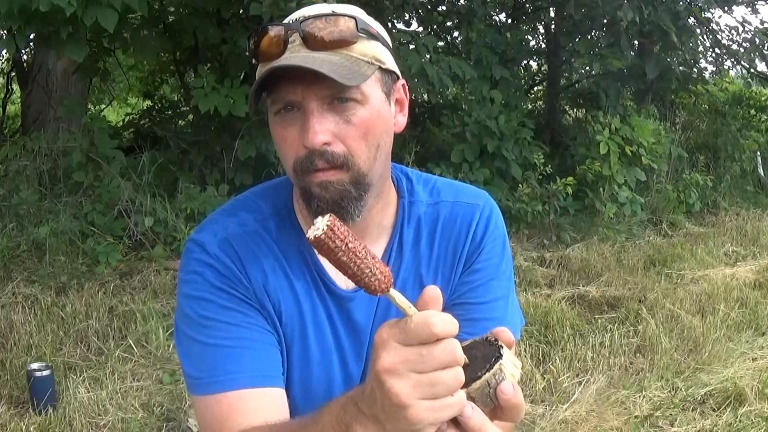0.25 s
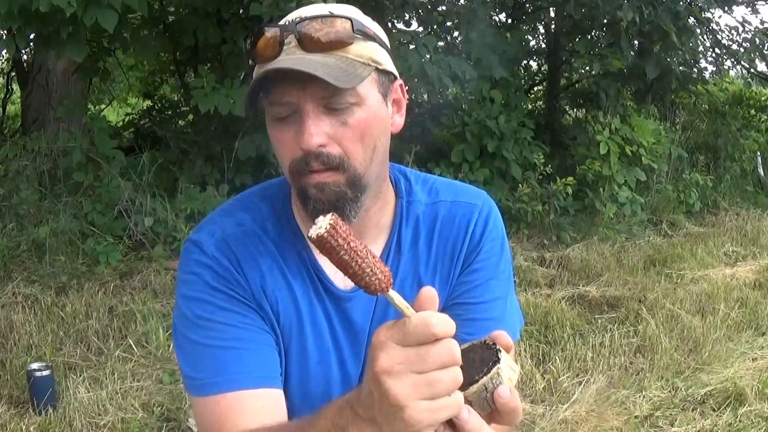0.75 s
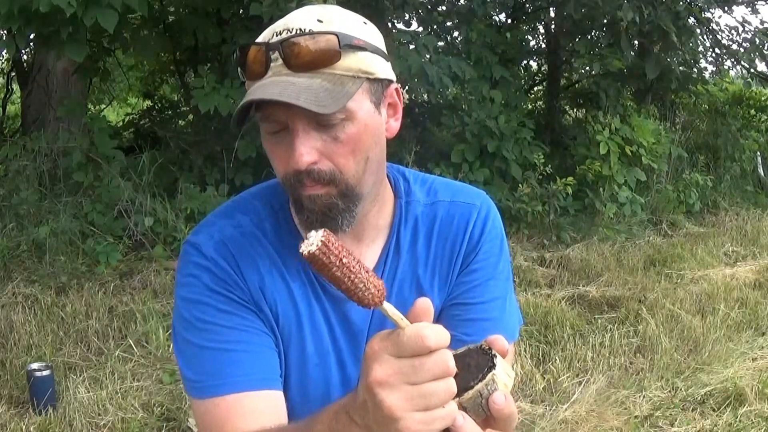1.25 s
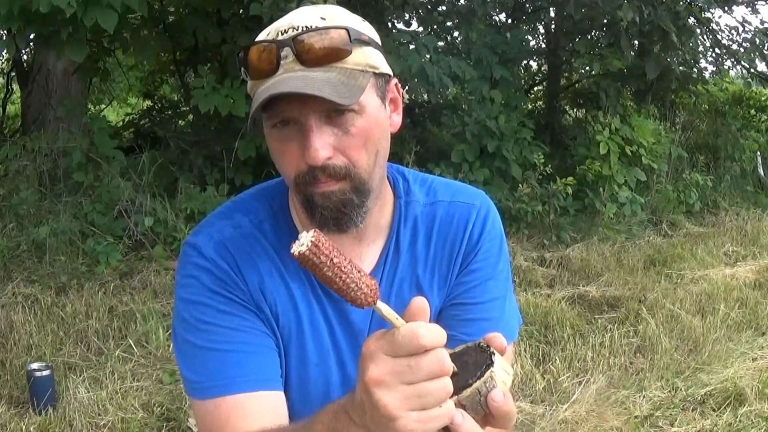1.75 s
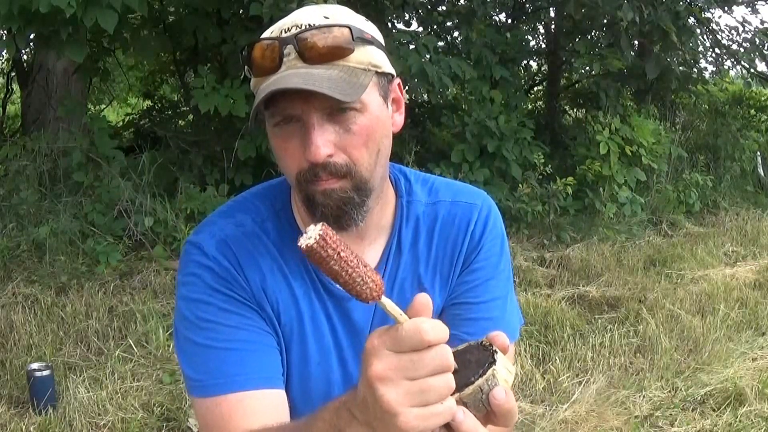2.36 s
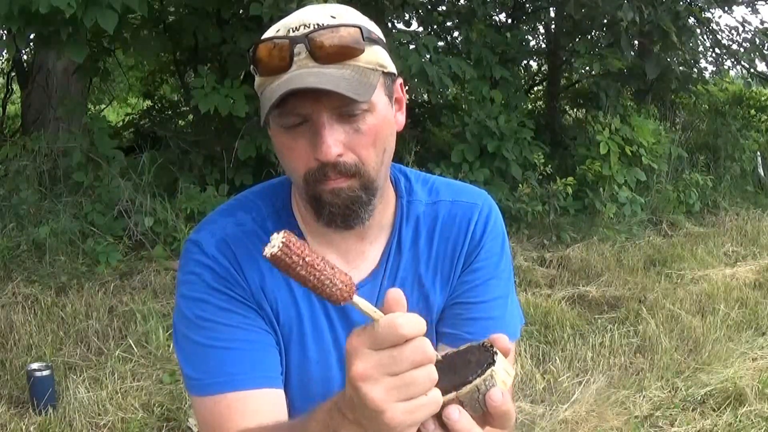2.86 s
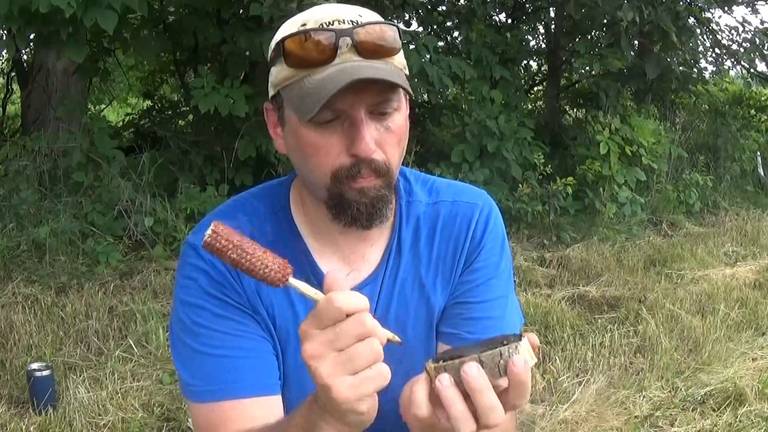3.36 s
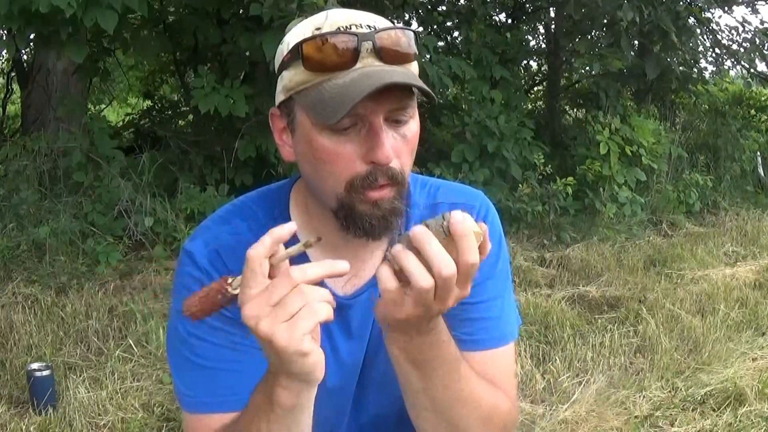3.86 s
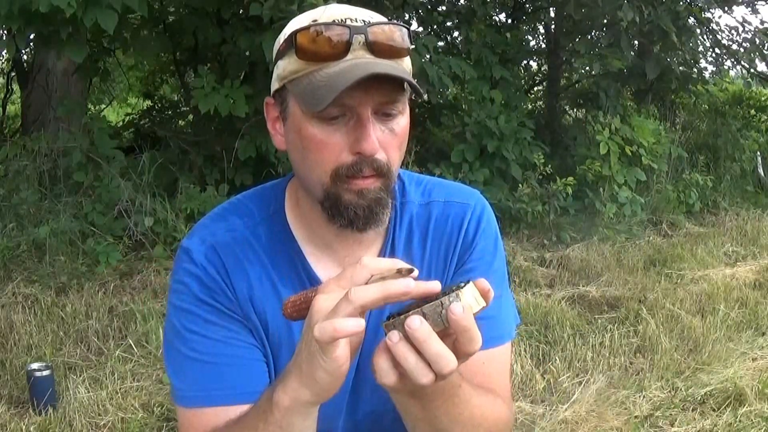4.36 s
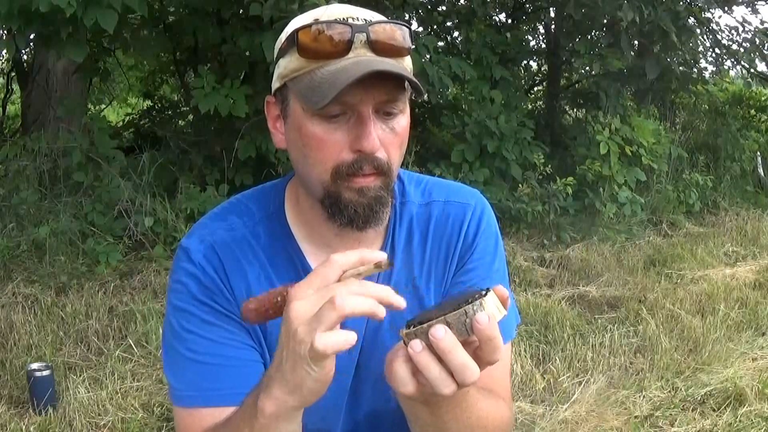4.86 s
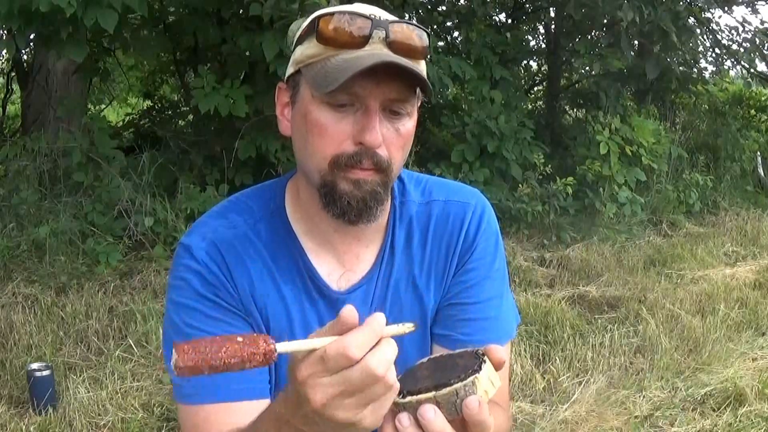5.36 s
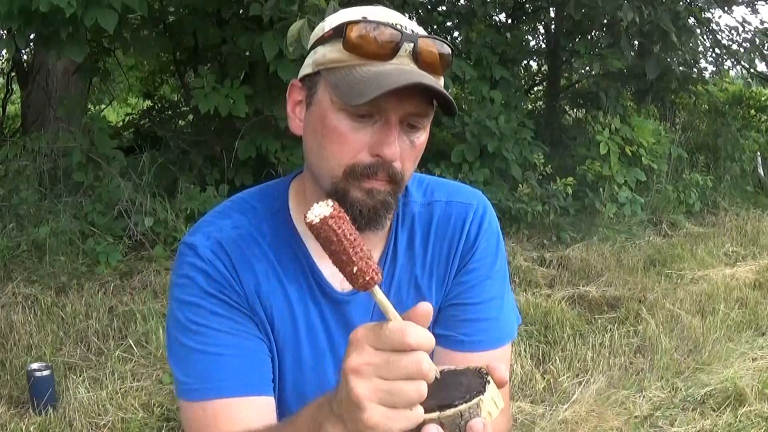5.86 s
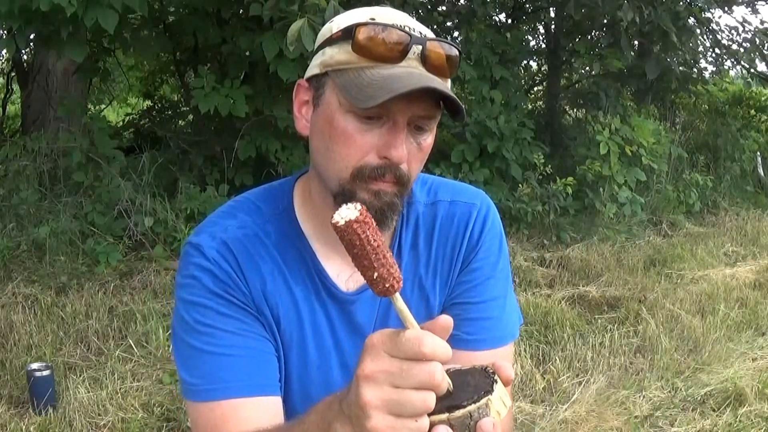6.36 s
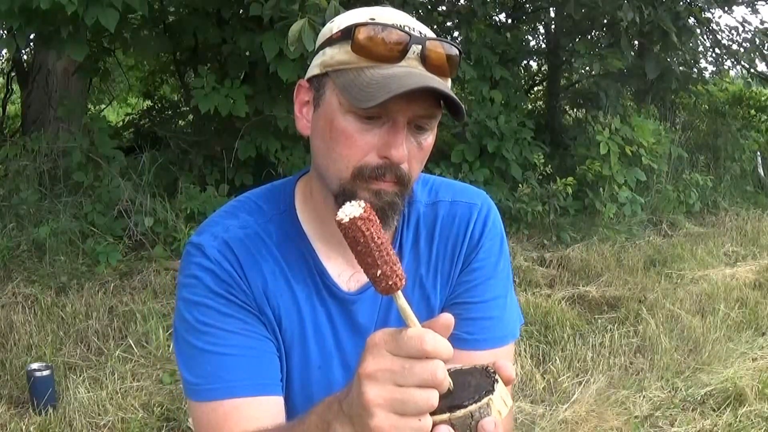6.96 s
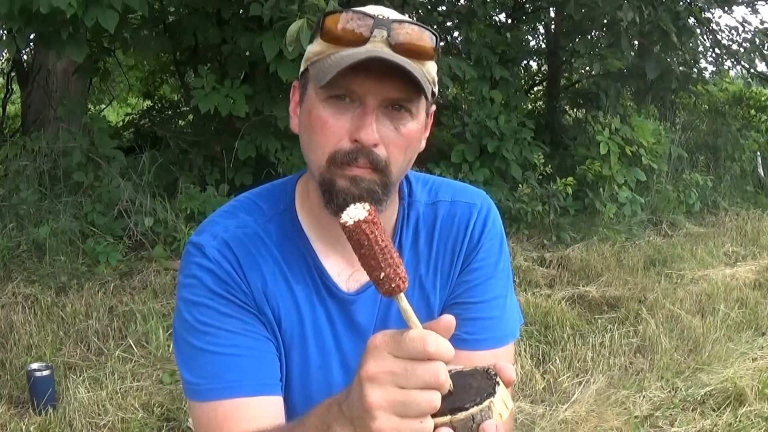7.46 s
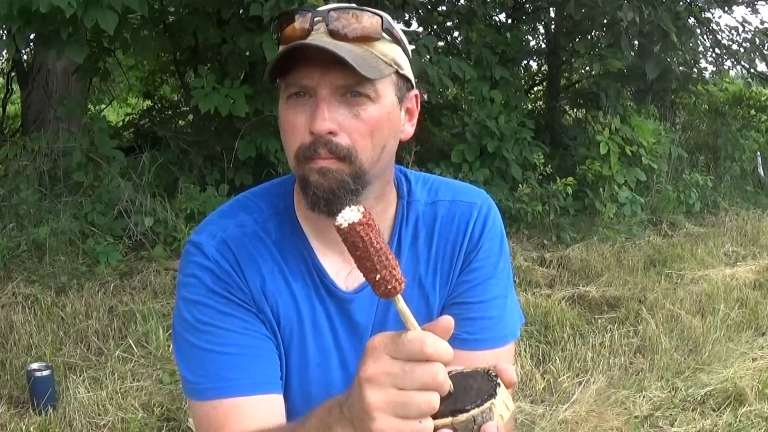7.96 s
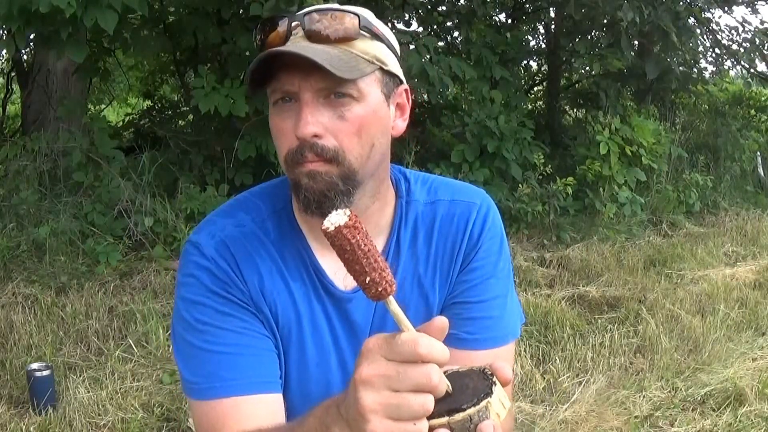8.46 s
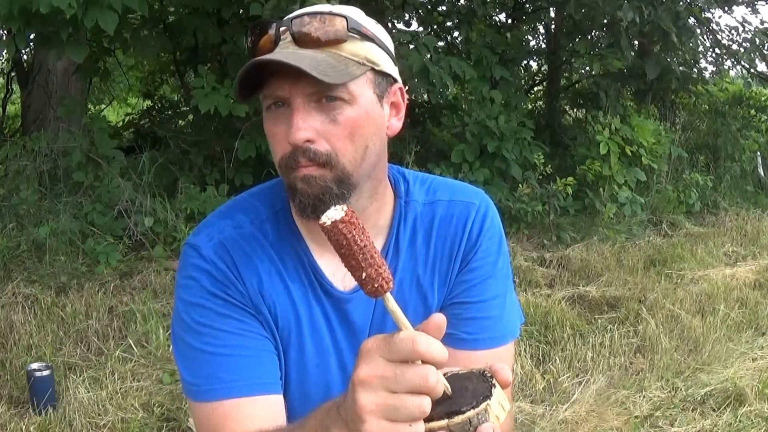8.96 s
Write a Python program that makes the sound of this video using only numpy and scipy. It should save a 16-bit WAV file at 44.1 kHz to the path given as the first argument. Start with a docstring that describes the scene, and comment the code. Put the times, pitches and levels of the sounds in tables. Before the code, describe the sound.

A wooden striker rubs on a slate turkey call, making ten raspy, squeaky yelps in an even run, with a few sharp taps of the tip. In the pause, fingers knock softly on the call and a songbird repeats a quick, buzzy phrase. Four softer, short clucks follow. The call is close and centred, at the edge of a wood with birds, faint insect hiss and a light breeze.

```python
"""At the edge of a wood, a friction turkey call plays ten yelps: a wooden striker sticks and slips
on slate several hundred times a second, and the pot under the slate resonates. In the pause the fingers
shift their grip and the nearest songbird repeats a short phrase. Four clucks follow from about 7 s.
Throughout, birds sing in the trees, insects hiss in the grass, air stirs and a faint ticking runs on."""
import sys
import numpy as np
from scipy import signal
from scipy.fft import rfft, irfft, next_fast_len
from scipy.io import wavfile

SR = 44100
rng = np.random.default_rng(int(sys.argv[2]) if len(sys.argv) > 2 else 0)


def wav_record(signal):
    """Record a signal, one row per channel, as 16-bit PCM in the file named by sys.argv[1]."""
    frames = np.transpose(np.atleast_2d(signal))
    bounded = np.clip(frames, -1, 1)
    # unit amplitude maps onto the largest positive 16-bit level
    quanta = np.round(bounded * 32767).astype(np.int16)
    wavfile.write(sys.argv[1], SR, quanta)


N = 406161
CUTOFF_HZ = 11050
FFT_SIZE = next_fast_len(N + SR)
BIN_HZ = np.maximum(np.arange(FFT_SIZE // 2 + 1) * SR / FFT_SIZE, 1)

# squeak_hz, fade_db, shaft_db
YELP_GRIP, CLUCK_GRIP = (10510, 25.6, -26.5), (10040, 12.4, -18.5)
# start_s, peak_pressure_s, end_s, attack_s, low_hz, last_hz, level_db, squeak_db
STRIKER_STROKES = [(0.204, 0.243, 0.2895, 0.027, 326.2, 651, -33, -7),
                   (0.48, 0.496, 0.578, 0.03, 355.4, 711, -29.5, -10),
                   (0.763, 0.791, 0.859, 0.024, 319.6, 683, -29.5, -8.5),
                   (1.044, 1.069, 1.134, 0.027, 314.2, 768, -27, -9.5),
                   (1.314, 1.338, 1.408, 0.026, 340.7, 530, -32, -11.5),
                   (1.609, 1.63, 1.681, 0.029, 352, 643, -26.5, -10.5),
                   (1.89, 1.921, 1.971, 0.031, 340.4, 794, -27.5, -10),
                   (2.157, 2.185, 2.242, 0.034, 338.6, 763, -25.5, -13),
                   (2.482, 2.494, 2.536, 0.0091, 419, 817, -26, -18),
                   (2.77, 2.789, 2.828, 0.0054, 393, 598, -28.5, -16.5),
                   (6.952, 6.972, 7.001, 0.015, 577.5, 890, -37, -10),
                   (7.46, 7.48, 7.509, 0.01, 406, 943, -36, -8),
                   (7.888, 7.909, 7.978, 0.014, 392.5, 964, -32.5, -7.5),
                   (8.333, 8.361, 8.405, 0.011, 333.2, 668, -32.5, -6.5)]

def turkey_call(regrip_s=5, sink_hz=249.9, release_s=.0059, tip_attack_s=.0027, swell_db=2, ease_db=4):
    """Pressure slows and sharpens the slips; as the hand eases, pitch climbs and the squeak fades."""
    out = np.zeros(N)
    for start, turn, end, attack_s, low_hz, last_hz, db, squeak_db in STRIKER_STROKES:
        squeak_hz, fade_db, shaft_db = YELP_GRIP if start < regrip_s else CLUCK_GRIP
        t = np.arange(start, end, 1 / SR)
        pressing = np.clip((turn - t) / (turn - start), 0, 1)
        easing = np.clip((t - turn) / (end - turn), 0, 1)
        pitch_hz = low_hz + sink_hz * pressing ** 2.1 + (last_hz - low_hz) * easing ** 1.8
        contact = np.clip((t - start) / attack_s, 0, 1) * np.clip((end - t) / release_s, 0, 1)
        force = contact * from_db(swell_db * easing - ease_db * easing ** 3) * slips(t, pitch_hz)
        rounded = signal.sosfilt(signal.butter(1, 2800, fs=SR, output="sos"), force)
        sharpness = from_db(-.6 * fade_db * easing ** 2)
        pot = signal.fftconvolve(sharpness * force + (1 - sharpness) * rounded, pot_ring())
        pot /= np.sqrt(np.sum(pot ** 2) / len(t))
        squeak_gain = np.clip((t - start) / tip_attack_s, .3, 1) * from_db(-fade_db * easing ** 2.36)
        squeak = rms_one(double_resonance(force * squeak_gain, squeak_hz, width_hz=1700))
        shaft = rms_one(double_resonance(sharpness * force, hz=3230, width_hz=1960))
        add(out, start, from_db(db + 1.5) * pot)
        add(out, start, from_db(db + squeak_db + 2) * squeak + from_db(db + shaft_db) * shaft)
    return out


def slips(t, pitch_hz, harmonics=38):
    """Stick-slip friction: one sharp, slightly gritty pulse per slip, nearly even in time and strength."""
    phase = 2 * np.pi * np.cumsum(pitch_hz * (1 + .01 * drift(t, 400))) / SR
    k = np.arange(1, harmonics + 1)[:, None]
    pulses = rms_one(np.sum(np.cos(k * phase) * (k * pitch_hz < CUTOFF_HZ + 1000), axis=0))
    grit = rms_one(np.exp(2 * (np.cos(phase - 1) - 1)) * rng.standard_normal(len(t)))
    return (pulses + .24 * grit) * from_db(1.2 * drift(t, 450))


# Broad response of slate and pot: freq_hz, gain_db
POT_RESPONSE = [(100, -60), (300, -49), (500, -25.5), (720, -14), (1150, -7.5), (1750, -5), (2000, -11),
                (2250, -14.5), (2800, -28.5), (3500, -22.5), (5400, -20), (6500, -22), (7800, -21.5),
                (9000, -29.5)]
# Resonances and notches: centre_hz, width_hz, gain_db
POT_RESONANCES = [(794, 81, 3), (913, 134, -6.5), (1147, 39, 3.5), (1894, 162, 12), (2197, 40, -16),
                  (2180, 67, 10), (2260, 96, -4), (2476, 230, 9.5)]
# Ring smeared by the slate's close modes: freq_hz, power_share
SLATE_SMEAR = [(2200, 0.08), (3000, 0.73), (5500, 0.14), (7500, 0.12), (9500, 0.64)]

def pot_ring(size=2048, slate_t60_s=.021, lag_hz=1650, lag_width_hz=700):
    """Response of slate and pot to one slip, a little different at each spot on the slate."""
    hz = np.maximum(np.arange(size // 2 + 1) * SR / size, 1)
    modes_db = sum(db / (1 + (2 * (hz - centre) / width) ** 2) for centre, width, db in POT_RESONANCES)
    # folding the cepstrum makes the pulse causal
    cepstrum = irfft(np.log(from_db(at_hz(POT_RESPONSE, hz) + modes_db)))
    cepstrum[1:size // 2] *= 2
    cepstrum[size // 2 + 1:] = 0
    slate = noise_burst(size, slate_t60_s)
    share = at_hz(SLATE_SMEAR, hz)
    smear = np.sqrt(1 - share) + np.sqrt(share) * rfft(slate) / np.sqrt(np.sum(slate ** 2))
    # allpass: bending waves near the main resonance arrive late
    pole = lag_hz ** 2 - hz ** 2 + 1j * hz * lag_width_hz
    return irfft(np.exp(rfft(cepstrum)) * smear * np.conj(pole) / pole)[:size // 2]


# start_s, peak_db, treble_db
STRIKER_TAPS = [(0.713, -37.5, -25), (1.007, -20, 17), (2.335, -35, 18), (6.553, -45, 21), (6.611, -48, 11)]

def striker_taps():
    """The tip lands on the slate with a tiny scratch."""
    out = np.zeros(N)
    for start, peak_db, treble_db in STRIKER_TAPS:
        scratch = noise_burst(int(.025 * SR), t60_s=.017)
        treble = rms_one(double_resonance(scratch, hz=9860, width_hz=1700))
        treble += .59 * rms_one(resonance(scratch, hz=2900, width_hz=2100))
        pot = rms_one(signal.fftconvolve(scratch, pot_ring())[:len(scratch)])
        tap = pot + from_db(treble_db) * treble
        add(out, start, from_db(peak_db) * tap / np.abs(tap).max())
    return out


# start_s, level_db
FINGER_KNOCKS = [(0.907, -61), (0.929, -62), (3.977, -58), (4.023, -58), (4.166, -57.5), (4.583, -60.5),
                 (4.751, -59.5), (4.796, -59)]

def finger_knocks(gain_db=14.5):
    """Fingers shift their grip with short, damped knocks."""
    out = np.zeros(N)
    for start, db in FINGER_KNOCKS:
        knock = resonance(noise_burst(int(.04 * SR), t60_s=.022), hz=520, width_hz=450)
        add(out, start, from_db(db + gain_db) * knock / np.abs(knock).max())
    return out


def songbirds(gain_db=4.5):
    """Birds to the right; fainter notes come from deeper in the wood, more blurred by leaves."""
    direct, blurred = np.zeros((2, N))
    for start, length_s, *voice, db in scattered_calls() + nearest_song() + twitters():
        t = start + np.arange(0, length_s, 1 / SR)
        note = from_db(db + gain_db) * bird_note(t, *voice)
        wet = np.interp(db, [-68, -38], [.65, .34])
        add(direct, start, np.sqrt(1 - wet) * note)
        add(blurred, start, np.sqrt(wet) * note)
    leaves = scatter(blurred, t60_s=.42, delay_s=.0077)
    return direct * from_db([[-2.8], [1.8]]) + leaves * from_db([[-1.3], [1.1]])


def bird_note(t, first_hz, last_hz, depth_hz, warble_hz):
    """A gliding whistle; a warble, voiced mostly on its upstrokes, makes it a buzz or trill."""
    cycle = 2 * np.pi * warble_hz * np.cumsum(1 + .2 * drift(t, 150)) / SR
    # slow trills break into pips, fast buzzes run together
    voicing = np.exp(np.cos(cycle - .7 * np.pi) * 70 / (warble_hz + 15))
    glide_hz = np.linspace(first_hz, last_hz, len(t)) * (1 + .00797 * drift(t, 150))
    pitch_hz = glide_hz + depth_hz * signal.sawtooth(cycle, .7)
    swell = signal.windows.tukey(len(t), .54 if warble_hz else .57) * from_db(2 * drift(t, 73.4))
    return rms_one(voicing * swell * np.sin(2 * np.pi * np.cumsum(pitch_hz) / SR))


# start_s, level_db
BIRD_RISES = [(2.039, -41.5), (2.25, -61), (2.423, -41), (2.704, -39), (4.302, -42), (5.08, -50.5),
              (5.521, -56.5)]
# start_s, first_hz, level_db
BIRD_SLURS = [(2.626, 4350, -48), (3.092, 4220, -48.5), (4.884, 3710, -61), (5.82, 2990, -65)]
# start_s, length_s, first_hz, level_db
BIRD_WHISTLES = [(0.573, 0.075, 3890, -61), (0.718, .22, 3390, -64), (0.91, 0.096, 6500, -60),
                 (1.126, .175, 3360, -60.5), (1.96, .05, 6180, -56.5), (2.361, 0.096, 6200, -59),
                 (2.497, 0.071, 4820, -48), (2.966, 0.11, 4750, -48.5), (3.107, 0.078, 6154, -40.5),
                 (4.29, 0.082, 4880, -60.5), (4.56, .1, 4890, -55.5), (4.692, 0.17, 7910, -58),
                 (4.732, 0.53, 4830, -59), (5.225, 0.2, 2585, -65), (8.028, 0.097, 5110, -65.5),
                 (8.165, 0.102, 4480, -71), (8.517, 0.17, 5100, -64), (8.991, 0.047, 7200, -65.5)]
# start_s, length_s, first_hz, last_hz, depth_hz, warble_hz, level_db
BIRD_BUZZES = [(2.33, 0.064, 3940, 5300, 300, 87, -54.5), (2.76, 0.27, 4430, 5590, 980, 97, -49.5),
               (3.16, 0.091, 3910, 4525, 457, 103, -39), (4.085, 0.12, 2453, 2367, 368, 70, -54),
               (4.37, .21, 7060, 7050, 574, 280, -55), (4.612, 0.034, 6230, 5760, 400, 108, -50),
               (5.01, 0.13, 7970, 8420, 1400, 110, -53.5), (5.105, 0.064, 4220, 4270, 510, 97, -48.5),
               (5.88, 0.13, 3360, 3630, 120, 210, -64.5), (5.95, 0.77, 4084, 4030, 206, 12.3, -73.5)]

def scattered_calls(rise_s=.039, rise_hz=(3150, 4310), slur_s=.053, slur_ratio=.73, sag_ratio=.96):
    """Bird notes: quick rises, falling slurs, sagging whistles, buzzes and trills."""
    rises = [(start, rise_s, *rise_hz, 0, 0, db) for start, db in BIRD_RISES]
    slurs = [(start, slur_s, hz, hz * slur_ratio, 0, 0, db) for start, hz, db in BIRD_SLURS]
    whistles = [(start, length, hz, hz * sag_ratio, 0, 0, db) for start, length, hz, db in BIRD_WHISTLES]
    return rises + slurs + whistles + list(BIRD_BUZZES)


# offset_s, length_s, first_hz, last_hz, depth_hz, warble_hz, level_db
SONG_PHRASE = [(0, 0.081, 4916, 4933, 871, 149.5, -44.5), (0.08, 0.0128, 6910, 5640, 0, 3.5, -46),
               (0.106, .02, 3450, 2890, -5, -0.5, -42), (.13, 0.01914, 3433, 2867, 3, 2, -46)]

def nearest_song(start_s=3.4, period_s=.1838, end_s=4.05):
    """One bird repeats a buzz, a high chip and two low chips, breaking off in the fourth round."""
    notes = [(start_s + k * period_s + offset_s, *note)
             for k in range(4) for offset_s, *note in SONG_PHRASE]
    return [note for note in notes if note[0] < end_s]


def twitters(rate_hz=5.5, depth_hz=200, warble_hz=110):
    """Faint random bird notes from deep in the wood."""
    slots = np.arange(0, N / SR - 1 / rate_hz, 1 / rate_hz)
    notes = []
    for slot_s in slots:
        late, long, high, slope, loud = rng.uniform(-1, 1, 5)
        start = slot_s + abs(late) / rate_hz
        length_s = .09 * (1 + long / 2)
        hz = 4000 * 2 ** (.35 * high)
        notes.append((start, length_s, hz, hz * (1 + .13 * slope), depth_hz, warble_hz, -72.5 + 3 * loud))
    return notes


# freq_hz, gain_db
TREE_RESPONSE = [(500, -31), (2000, -28), (5000, -4.5), (10000, 2.5), (12000, -4.5)]

def tree_echo(call):
    """The trees send back mostly treble, late and diffuse."""
    reflected = irfft(rfft(call, FFT_SIZE) * from_db(at_hz(TREE_RESPONSE, BIN_HZ)), FFT_SIZE)[:N]
    return scatter(reflected, t60_s=.13, delay_s=.11)


# Spectra: freq_hz, density_db
BREEZE_SPECTRUM = [(15, -51), (25, -49.5), (48, -11), (422, -3), (505, -1), (1110, -2), (1330, -4),
                   (2100, -5.5), (2270, -7), (2510, -4.5), (4070, -11), (6440, -14.5), (7130, -18.5),
                   (8530, -14.5), (11000, -36), (14300, -52.5), (22000, -120)]
INSECT_SPECTRUM = [(100, -70), (4000, -12), (6500, -4), (8500, -5.5), (9800, 4), (11000, 4), (14000, -42)]
CHORUS_SPECTRUM = [(100, -70), (1500, -35), (2600, -16), (3400, -3), (4600, 0), (5300, -2), (6000, -20),
                   (9000, -45)]
# Envelopes: time_s, level_db
BREEZE_ENVELOPE = [(0, -61), (3, -59.5), (4.3, -58.5), (5.8, -62), (9.2, -63.5)]
INSECT_ENVELOPE = [(0.0, -61), (1.13, -65), (1.69, -65), (2.79, -59), (4.69, -60.5), (6.89, -70.5),
                   (9.2, -69)]
CHORUS_ENVELOPE = [(0.0, -61), (1.31, -51), (1.87, -57), (2.69, -45.5), (3.76, -53), (4.35, -76),
                   (5.02, -54.5), (5.64, -71), (8.74, -61.5), (9.2, -69)]

def meadow(insect_gain_db=1, chorus_gain_db=-4.5):
    """Insects in the grass, a blurred chorus of far-off birds and a soft breeze."""
    t = np.arange(N) / SR
    insect_db = np.interp(t, *np.transpose(INSECT_ENVELOPE)) + insect_gain_db + .9 * drift(t, 25)
    chorus_db = np.interp(t, *np.transpose(CHORUS_ENVELOPE)) + chorus_gain_db + 2 * drift(t, 14)
    breeze_db = np.interp(t, *np.transpose(BREEZE_ENVELOPE))
    insects = from_db(insect_db) * diffuse_noise(INSECT_SPECTRUM)
    chorus = from_db(chorus_db) * diffuse_noise(CHORUS_SPECTRUM)
    breeze = from_db(breeze_db) * diffuse_noise(BREEZE_SPECTRUM)
    return insects + chorus + breeze


# freq_hz, left_right_correlation
EAR_CORRELATION = [(60, 1), (140, 0.74), (350, 0.5), (840, 0.17), (2020, 0.36), (4860, 0.8), (11700, 0.82)]

def diffuse_noise(spectrum):
    """Unit-rms noise from all around, least alike at the two ears in the midrange."""
    mid, side = rfft(rng.standard_normal((2, FFT_SIZE)))
    alike = np.clip(at_hz(EAR_CORRELATION, BIN_HZ), -.99, .99)
    ears = np.sqrt(1 + alike) * mid + np.sqrt(1 - alike) * side * [[1], [-1]]
    return rms_one(irfft(ears * from_db(at_hz(spectrum, BIN_HZ)), FFT_SIZE)[:, :N])


def ticking(level_db=-76, rate_hz=30, decay_s=.0013):
    """A small mechanism ticks faintly and evenly."""
    since_tick_s = np.arange(N) / SR % (1 / rate_hz)
    bursts = rng.standard_normal(N) * np.exp(-since_tick_s / decay_s)
    return from_db(level_db) * rms_one(double_resonance(bursts, hz=2580, width_hz=450))


def scatter(x, t60_s, delay_s):
    """Dense, decaying reflections, different at each ear."""
    tail = np.array([noise_burst(int(t60_s * SR), t60_s) for ear in range(2)])
    tail /= np.sqrt(np.sum(tail ** 2) / 2)
    delayed = np.pad(tail, ((0, 0), (int(delay_s * SR), 0)))
    return signal.oaconvolve(x[None], delayed, axes=1)[:, :N]


def resonance(x, hz, width_hz):
    """Two-pole resonance, unity peak gain."""
    r = np.exp(-np.pi * width_hz / SR)
    feedback = [1, -2 * r * np.cos(2 * np.pi * hz / SR), r * r]
    return signal.lfilter(np.array([1, 0, -1]) * (1 - r * r) / 2, feedback, x)


def double_resonance(x, hz, width_hz):
    return resonance(resonance(x, hz, width_hz), hz, width_hz)


def noise_burst(samples, t60_s):
    return rng.standard_normal(samples) * from_db(-60 * np.arange(samples) / SR / t60_s)


def drift(t, rate_hz):
    """Random wander, spread about 1."""
    knots = rng.standard_normal(int((t[-1] - t[0]) * rate_hz) + 2)
    return np.interp((t - t[0]) * rate_hz, np.arange(len(knots)), knots)


def at_hz(points, hz):
    """Interpolate on a log-frequency axis."""
    knots_hz, values = np.transpose(points)
    return np.interp(np.log(hz), np.log(knots_hz), values)


def from_db(db):
    return 10 ** (np.asarray(db) / 20)


def rms_one(x):
    return x / np.sqrt(np.mean(x ** 2) + 1e-20)


def add(out, start_s, x):
    i = int(start_s * SR)
    out[i:i + len(x)] += x[:N - i]


def scene():
    """The call is close and central, scattered by the ground and echoed faintly by the trees."""
    call = turkey_call() + striker_taps()
    ground = from_db(-15.5) * scatter(call, t60_s=.04, delay_s=.0014)
    trees = from_db(-18.5) * tree_echo(call)
    direct = (call + finger_knocks()) * from_db([[-.3], [.3]])
    return direct + ground + trees + songbirds() + meadow() + ticking()


def record(dry):
    """Steep low-pass."""
    lowpass = signal.firwin(601, CUTOFF_HZ, window=("kaiser", 8), fs=SR)
    return signal.oaconvolve(dry, lowpass[None], "same", axes=1)


dry = scene()
out = record(dry)
wav_record(out)
```